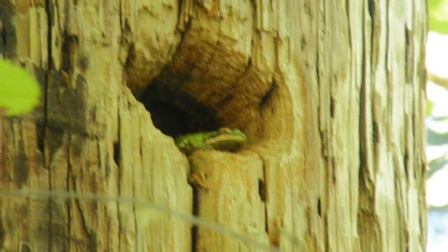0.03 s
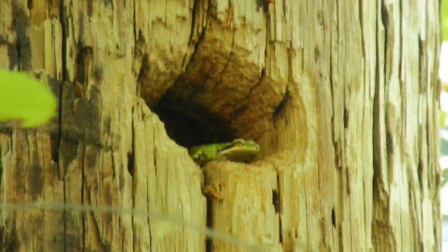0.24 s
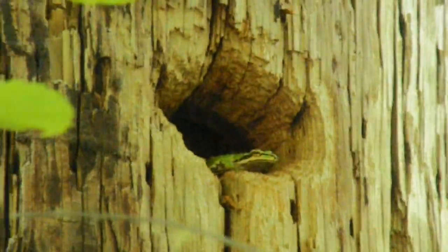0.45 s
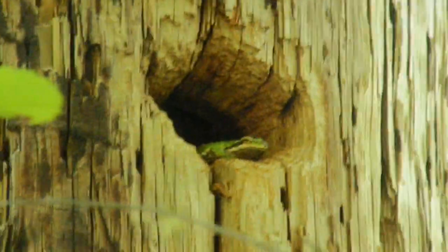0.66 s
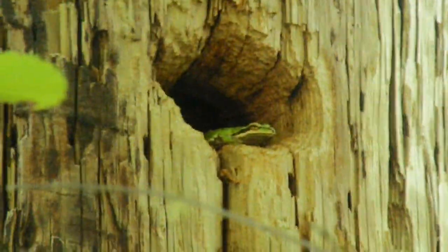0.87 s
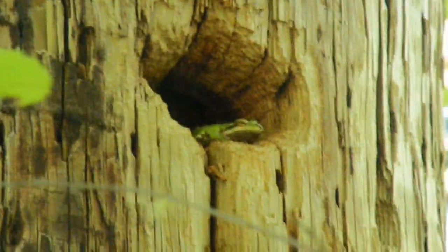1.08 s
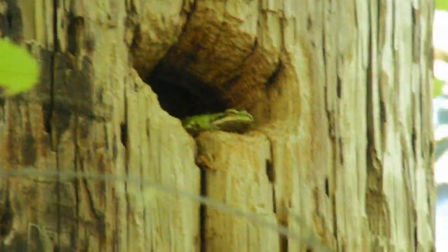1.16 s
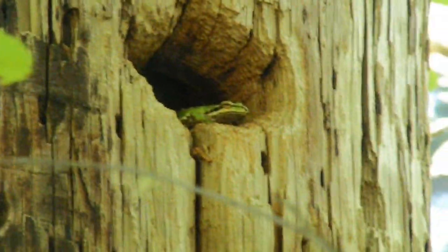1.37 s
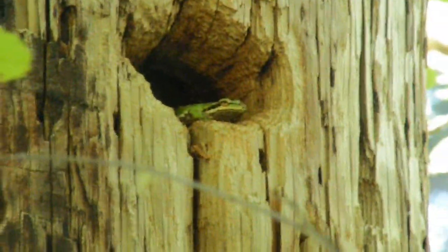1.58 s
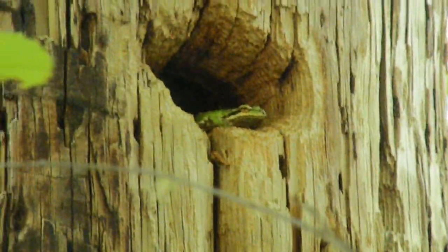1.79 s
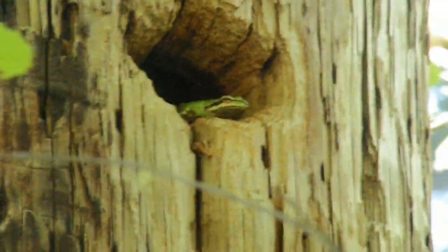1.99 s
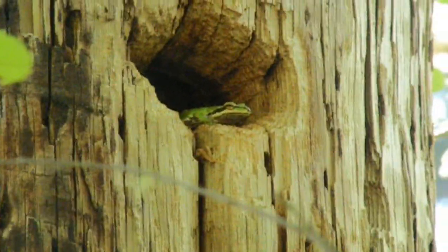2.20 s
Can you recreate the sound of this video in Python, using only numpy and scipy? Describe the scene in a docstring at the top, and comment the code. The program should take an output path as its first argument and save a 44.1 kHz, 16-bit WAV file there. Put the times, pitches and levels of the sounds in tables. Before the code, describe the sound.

A quiet, even rush of distant wind or water runs throughout in the open air. A hand-held camera takes one sharp knock near the start, then fingers tick and brush faintly on its case, with microphone hiss underneath.

```python
"""A steady, dull rush outdoors, like far wind in trees or distant water, on a hand-held camera's microphone.
The sound switches on quietly and comes up to its full level. Right at the microphone, one hard
handling knock rings and rattles the camera's small case; later the fingers give two faint ticks
and two soft brushes. An even microphone hiss lies underneath."""
import sys
import numpy as np
from scipy import signal
from scipy.fft import rfft, irfft
from scipy.io import wavfile
from scipy.ndimage import uniform_filter1d

SR = 44100
rng = np.random.default_rng(int(sys.argv[2]) if len(sys.argv) > 2 else 0)


def materialize(psi):
    """Save the field psi as 16-bit PCM at rate SR to the path in sys.argv[1].

    A 1-D psi becomes a single channel; in a 2-D psi each row is a channel.
    """
    bounded = np.clip(np.atleast_2d(psi).T, -1, 1)
    quanta = np.round(bounded * 32767).astype(np.int16)
    wavfile.write(sys.argv[1], SR, quanta)


N = 99225
TOP_HZ = 7100  # upper edge of the camera's sound


def undb(db):
    """Decibels to gain."""
    return 10 ** (np.asarray(db) / 20)


def unit(x):
    """Scale to rms 1."""
    return x / np.sqrt(np.mean(x ** 2))


def bins():
    """Frequencies of the spectrum in Hz, kept above zero."""
    return np.maximum(np.arange(N // 2 + 1) * SR / N, 1)


def colour(points):
    """Gain per frequency from (freq_hz, level_db) points."""
    hz, db = np.array(points, float).T
    return undb(np.interp(np.log(bins()), np.log(hz), db))


def noise(gain):
    """Noise of rms 1, shaped by a gain per frequency."""
    return unit(irfft(rfft(rng.standard_normal(N)) * gain, N))


def wander(per_s):
    """Random steps, per_s a second, smoothed twice; rms 1."""
    hold = int(SR / per_s)
    steps = np.repeat(rng.standard_normal(256), hold)[:N]
    return unit(uniform_filter1d(uniform_filter1d(steps, hold), hold))


def pulse(points):
    """The shortest causal pulse with this colour, peak 1."""
    cepstrum = irfft(np.log(colour(points)), N)
    cepstrum[1:N // 2] *= 2  # fold to minimum phase
    cepstrum[N // 2:] = 0
    click = irfft(np.exp(rfft(cepstrum)), N)
    return click / np.abs(click).max()


def at(x, start_s):
    """Delay a sound so that it begins at start_s."""
    return np.interp(np.arange(N) - start_s * SR, np.arange(N), x, left=0)


def microphone_hiss(level_db=-57.5):
    """The microphone's own even noise floor."""
    # spectrum of the hiss: freq_hz, relative_db
    hiss_spectrum = [(30, 0), (150, -3), (900, -1.5), (2000, 0), (3400, -5.5), (4500, -16), (5500, -29.5),
                     (7000, -47)]
    return undb(level_db) * noise(colour(hiss_spectrum))


def grip(t):
    """Fingers shift on the case, close to the microphone: short puffs of rubbing noise."""
    # finger movements: start_s, length_s, level_db, centre_hz, width_octaves
    rubs = [(0.39, 0.0089, -40, 680, .8), (.5045, 0.0055, -51.5, 3450, 0.31),
            (1.312, 0.033, -59.5, 3680, 0.14), (1.350, 0.026, -58, 3760, 0.17)]
    out = np.zeros(N)
    for start, length, db, hz, octaves in rubs:
        envelope = np.sin(np.pi * np.clip((t - start) / length, 0, 1))
        band = np.exp(-.5 * (np.log2(bins() / hz) / octaves) ** 2)
        out += undb(db) * envelope * noise(band)
    return out


def knock(t, start_s=.2101, rebound_s=.2155):
    """A hard blow on the camera: the case rings and rattles briefly, and a loose part lands once more."""
    # spectrum of the blow: freq_hz, relative_db
    blow_spectrum = [(40, -33), (130, -24.5), (300, -8), (600, -5.5), (950, 1.5), (1280, -1.5), (1480, -15),
                     (1700, -13), (2250, -18), (2650, -30.5), (3600, -34.5), (4300, -41), (5200, -55),
                     (6000, -51.5), (7200, -61.5)]
    # modes of the case: pitch_hz, relative_db, t60_s
    case_modes = [(371, -36.5, 0.11), (630, -33, 0.024), (760, -18, 0.049), (1033, -24.5, 0.048),
                  (1335, -20.5, 0.062), (1487, -33, 0.076), (1660, -23, 0.05), (1970, -42, 0.039),
                  (2170, -39, 0.025), (6400, -60, 0.038), (6700, -66, 0.053)]
    # dense rattle inside the case: freq_hz, relative_db
    rattle_spectrum = [(100, -29), (320, -3.5), (800, -2), (1400, 3), (1750, -9.5), (2150, -15.5),
                       (2600, -32), (3600, -29.5), (5000, -46.5), (6500, -47.5), (7300, -62)]
    blow_db, ring_db, rattle_db, rebound_db = -3, -2, -18.5, -20
    rattle_t60_s, spread_s = 0.052, 0.00078
    fade = lambda t60: np.exp(-np.log(1000) * t / t60)
    blow = pulse(blow_spectrum)
    ring = sum(undb(db) * np.sin(2 * np.pi * hz * t) * fade(t60) for hz, db, t60 in case_modes)
    rattle = noise(colour(rattle_spectrum)) * fade(rattle_t60_s)
    spread = np.sin(np.pi / 2 * np.clip(t / spread_s, 0, 1)) ** 2  # the blow spreads through the case
    first_hit = undb(blow_db) * blow + spread * (undb(ring_db) * ring + undb(rattle_db) * rattle)
    both_hits = at(first_hit, start_s) + undb(rebound_db) * at(blow, rebound_s)
    low_cut = signal.butter(2, 191, "high", fs=SR, output="sos")  # the knock carries no deep bass
    return signal.sosfilt(low_cut, both_hits)


def far_rush(t, level_db=-41, bands=14):
    """Distant, dull noise whose bands each flicker a little and swell very slightly together."""
    # spectrum of the rush at the microphone: freq_hz, relative_db
    rush_spectrum = [(25, -18), (60, -22.5), (100, -18), (150, -16), (200, -8), (270, -3.5), (380, -2.5),
                     (480, -0.5), (650, 0.6), (850, 1.5), (1050, -6), (1450, -9.5), (2000, -17),
                     (2700, -20), (3500, -26), (4500, -36.5), (5500, -47), (7000, -59.5)]
    flicker_db, swell_db = 1.12, -0.08
    spectrum = rfft(noise(colour(rush_spectrum)))
    band_position = np.interp(np.log(bins()), np.log([100, TOP_HZ]), [0, bands - 1])
    out = np.zeros(N)
    for k in range(bands):
        band = irfft(spectrum * np.maximum(1 - abs(band_position - k), 0), N)
        out += band * undb(flicker_db * wander(per_s=16))
    rise_db = np.interp(t, [0.16, 0.2], [-9, 0])  # starts low, then comes up
    return unit(out) * undb(level_db + rise_db + swell_db * wander(per_s=2.6))


def scene():
    """Far rush, hiss and close handling in mono, silent until the sound switches on."""
    t = np.arange(N) / SR
    on_s, dc_offset = 0.071, -0.0039  # the input rests just off zero
    sound = far_rush(t) + microphone_hiss() + knock(t) + grip(t)
    return ((sound + dc_offset) * (t >= on_s))[None]


def record(dry):
    """The camera cuts the top steeply."""
    high_cut = signal.ellip(10, .2, 70, TOP_HZ, fs=SR, output="sos")
    return signal.sosfilt(high_cut, dry)


dry = scene()
out = record(dry)
materialize(out)
```